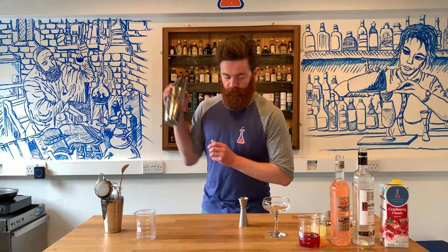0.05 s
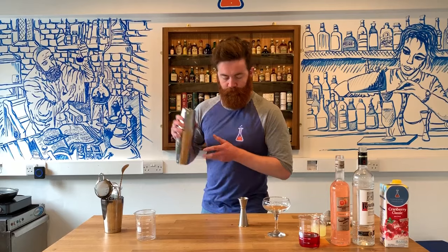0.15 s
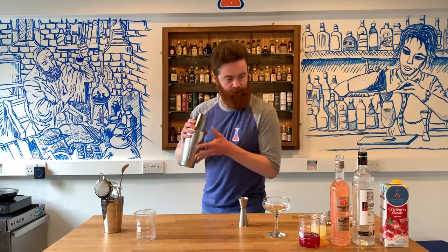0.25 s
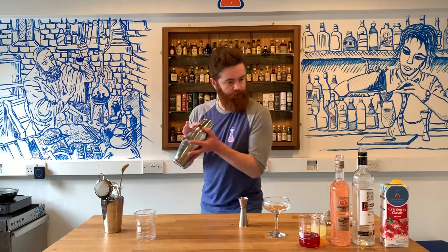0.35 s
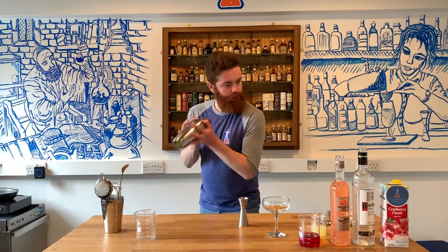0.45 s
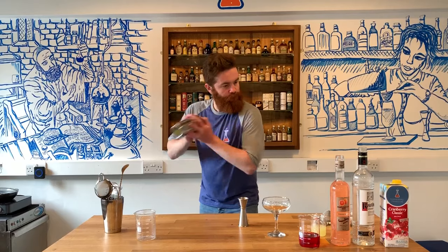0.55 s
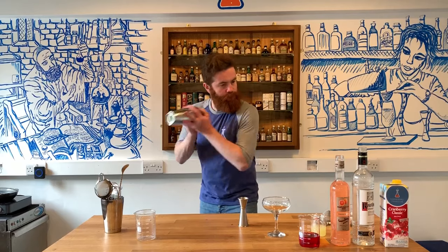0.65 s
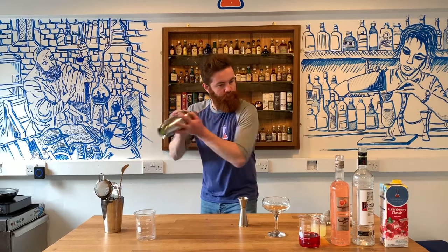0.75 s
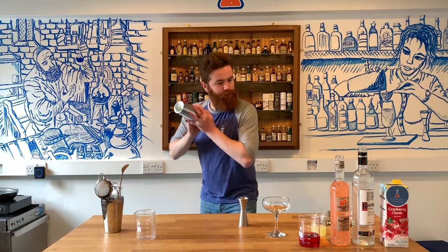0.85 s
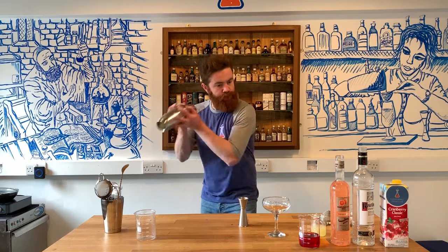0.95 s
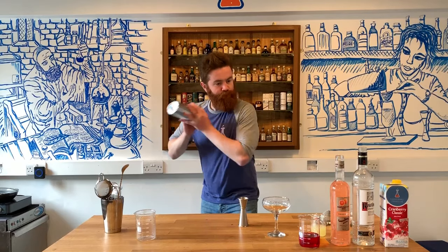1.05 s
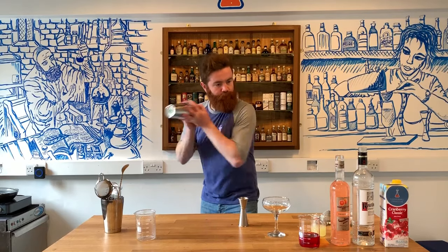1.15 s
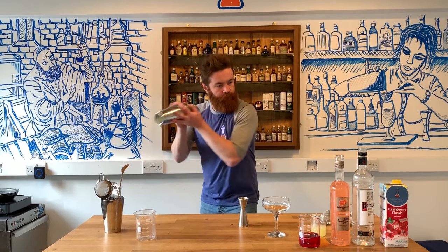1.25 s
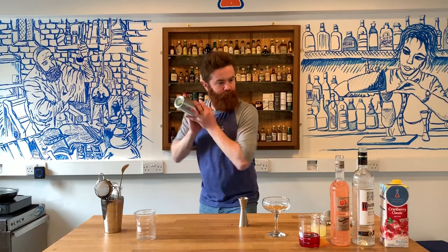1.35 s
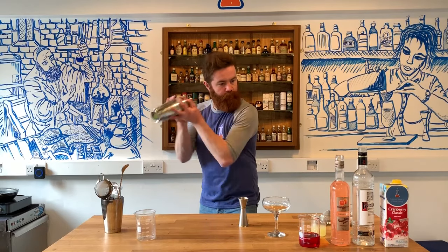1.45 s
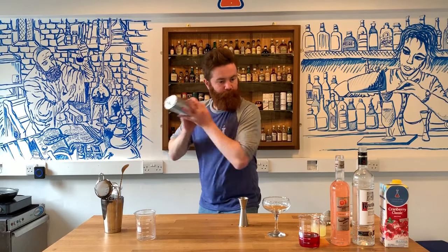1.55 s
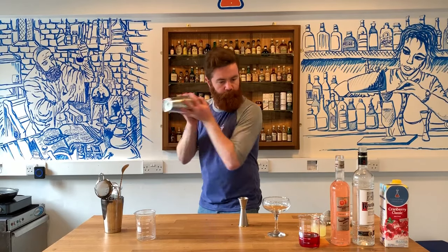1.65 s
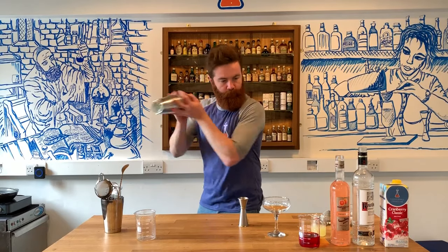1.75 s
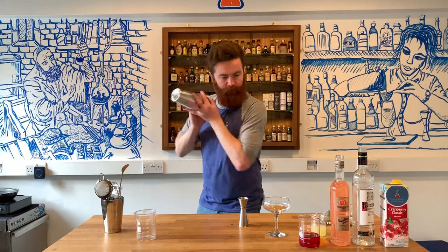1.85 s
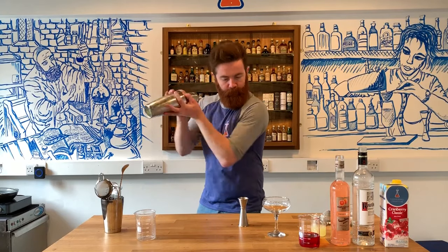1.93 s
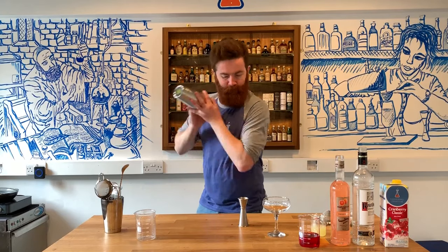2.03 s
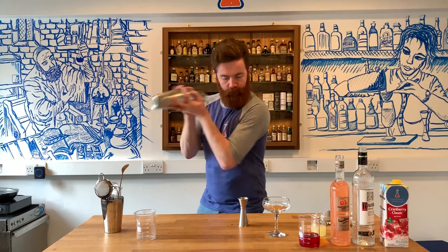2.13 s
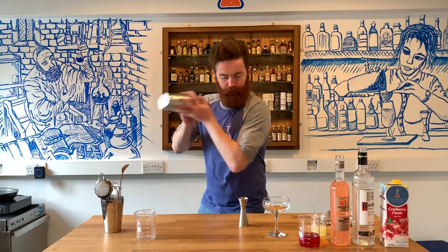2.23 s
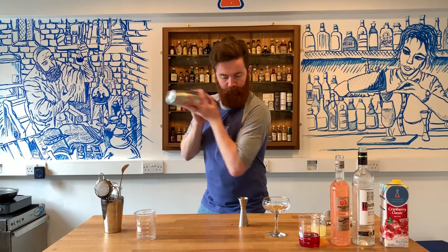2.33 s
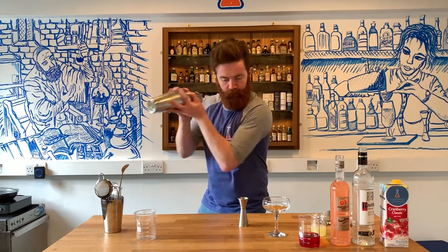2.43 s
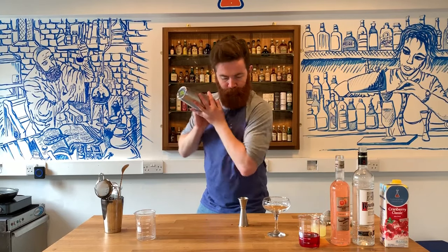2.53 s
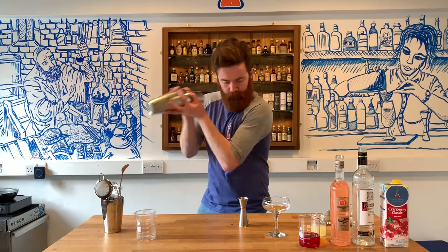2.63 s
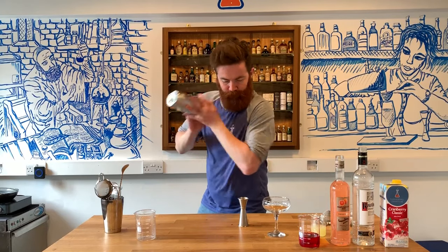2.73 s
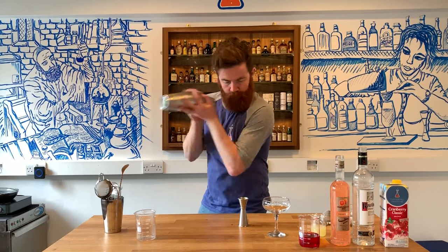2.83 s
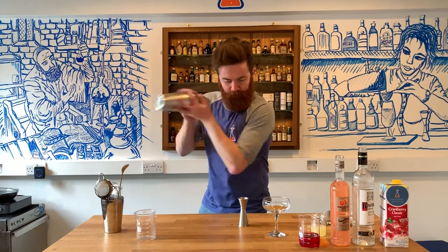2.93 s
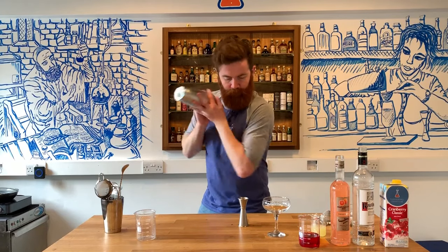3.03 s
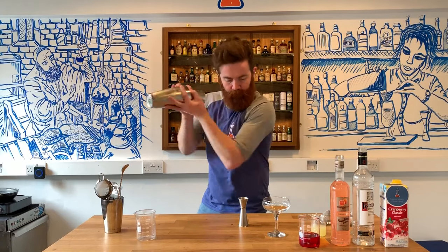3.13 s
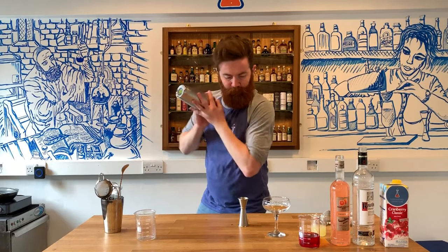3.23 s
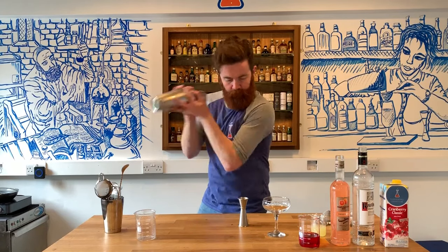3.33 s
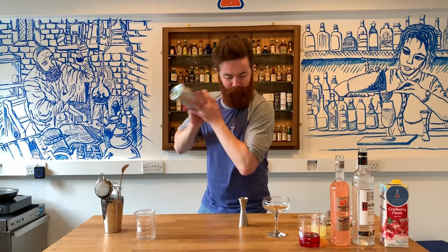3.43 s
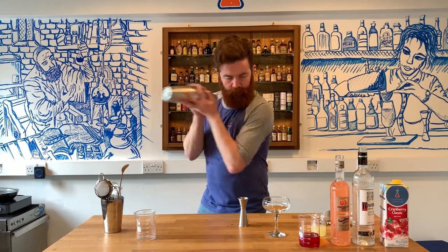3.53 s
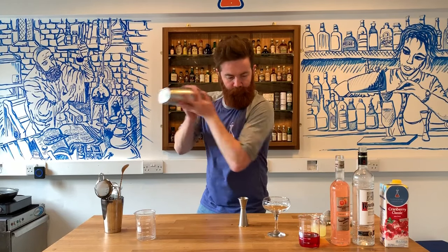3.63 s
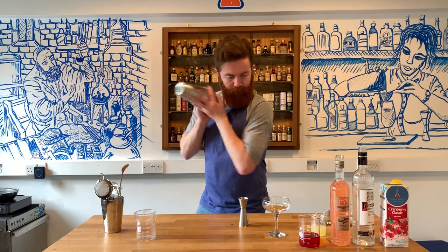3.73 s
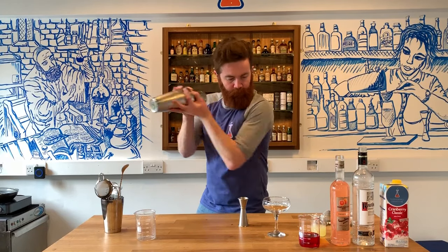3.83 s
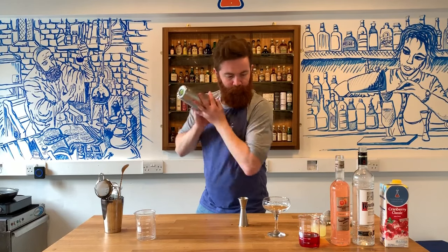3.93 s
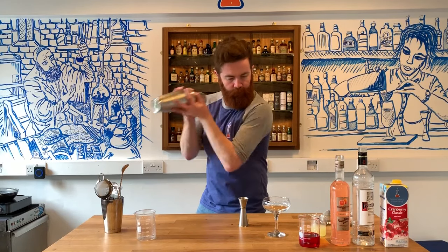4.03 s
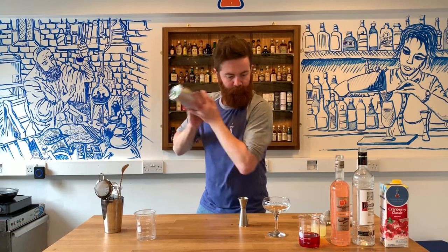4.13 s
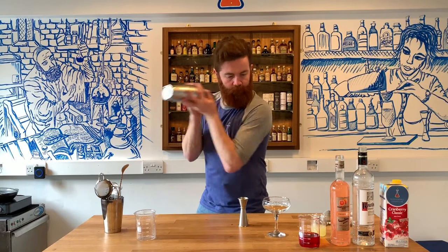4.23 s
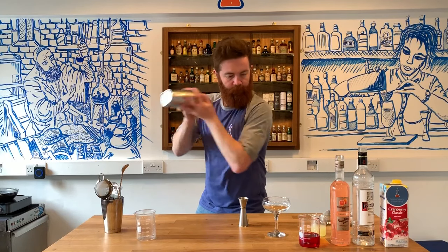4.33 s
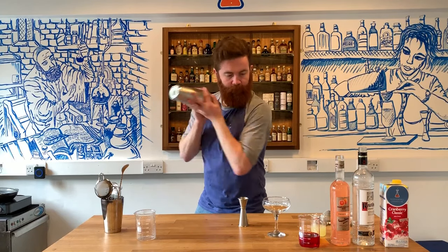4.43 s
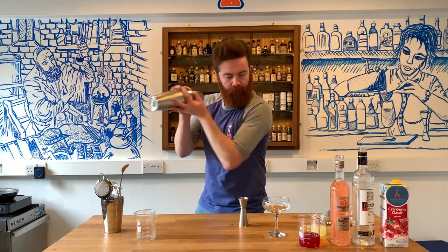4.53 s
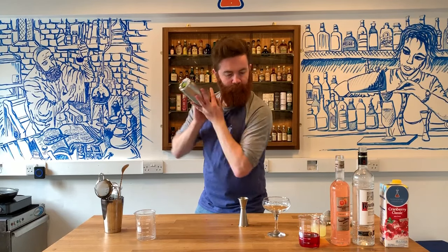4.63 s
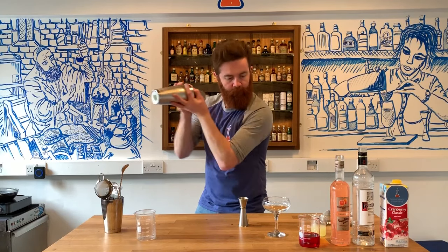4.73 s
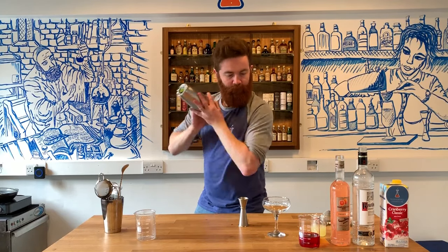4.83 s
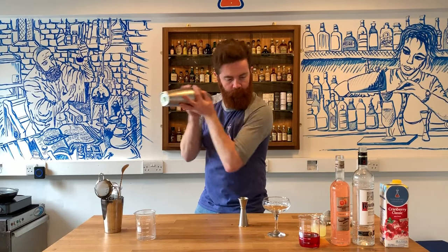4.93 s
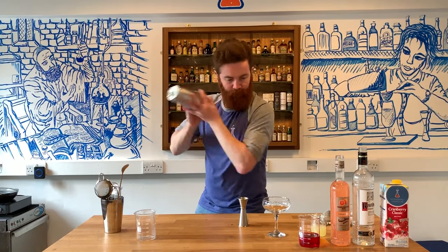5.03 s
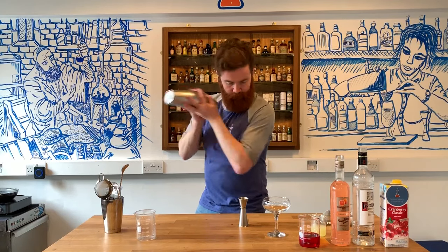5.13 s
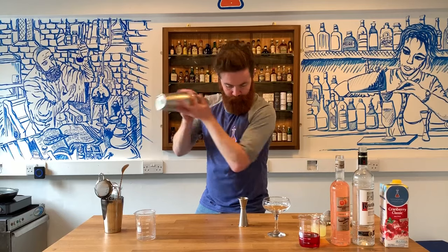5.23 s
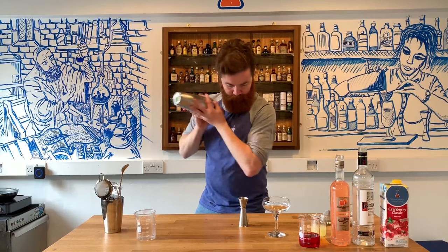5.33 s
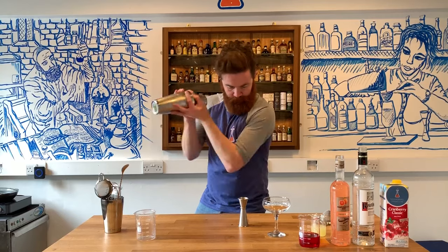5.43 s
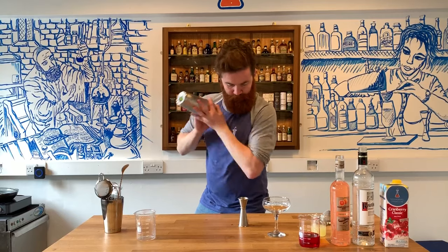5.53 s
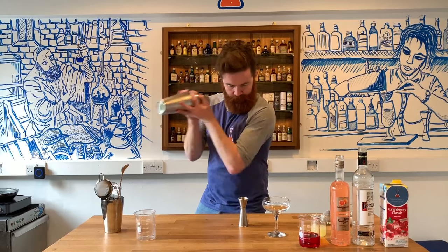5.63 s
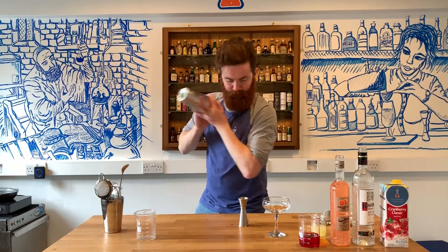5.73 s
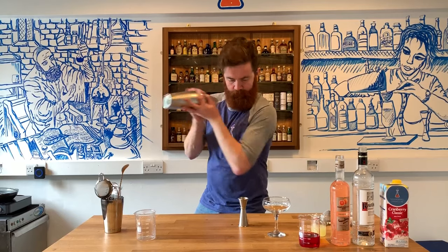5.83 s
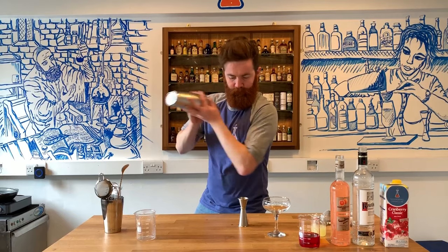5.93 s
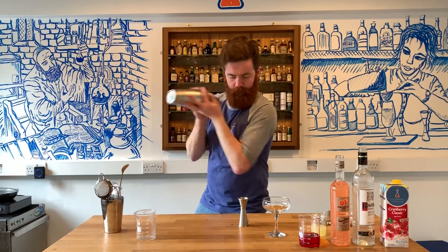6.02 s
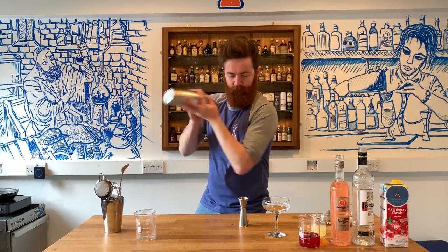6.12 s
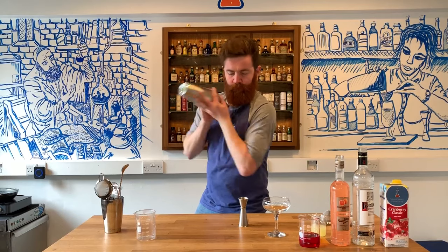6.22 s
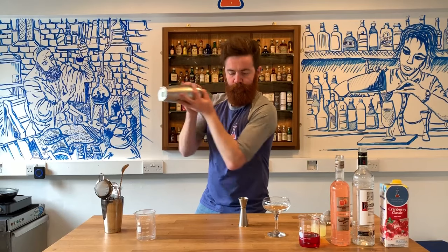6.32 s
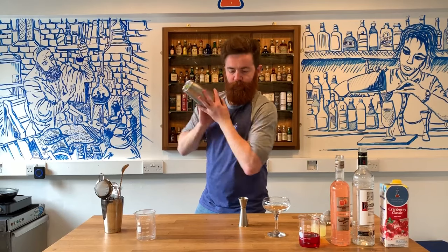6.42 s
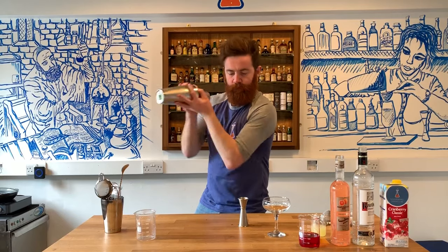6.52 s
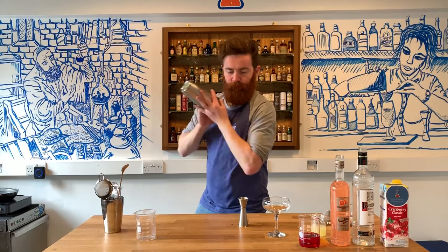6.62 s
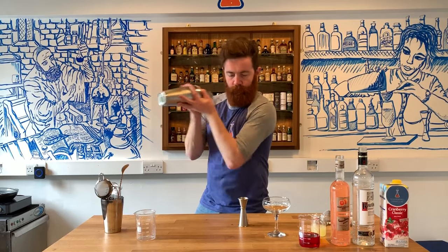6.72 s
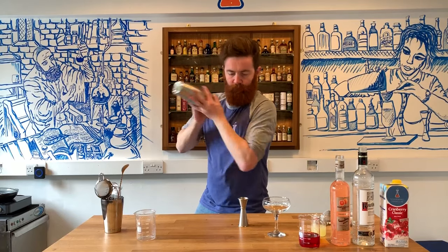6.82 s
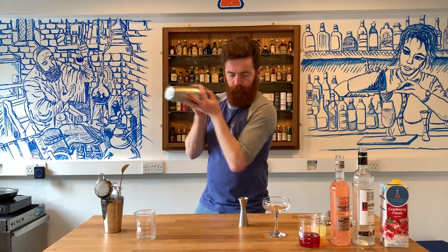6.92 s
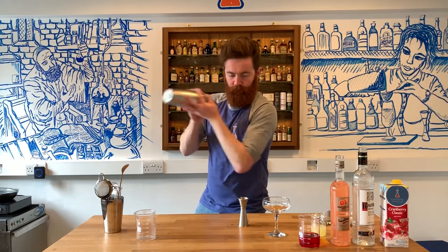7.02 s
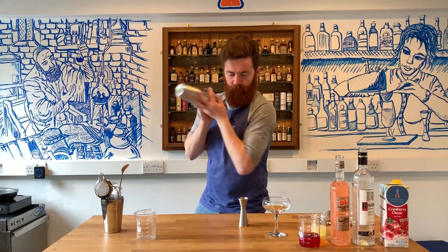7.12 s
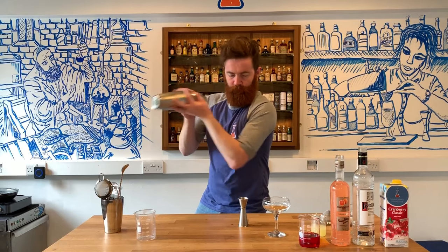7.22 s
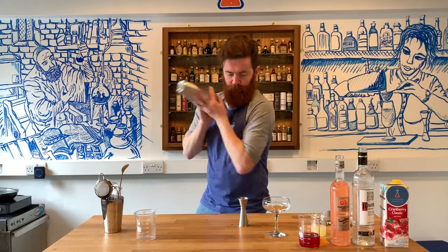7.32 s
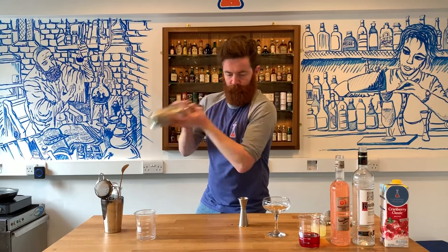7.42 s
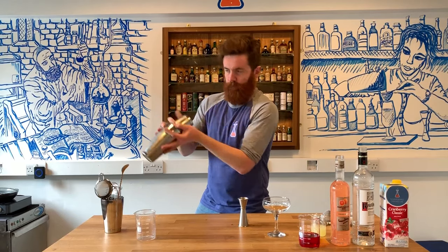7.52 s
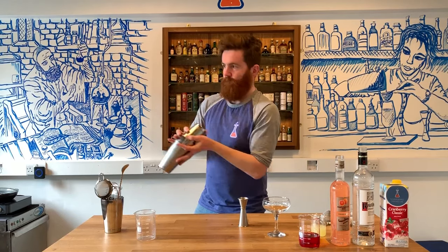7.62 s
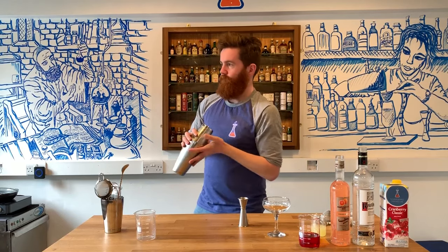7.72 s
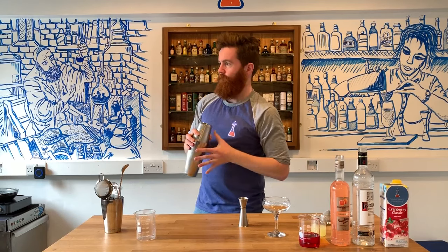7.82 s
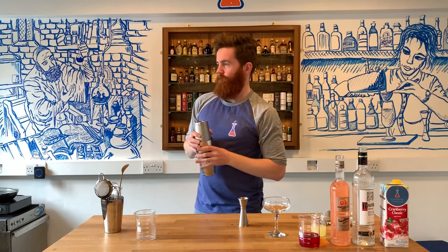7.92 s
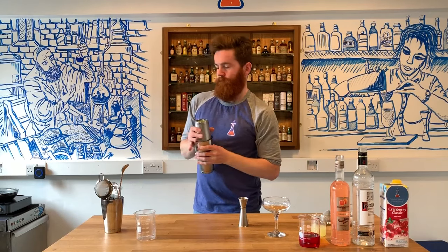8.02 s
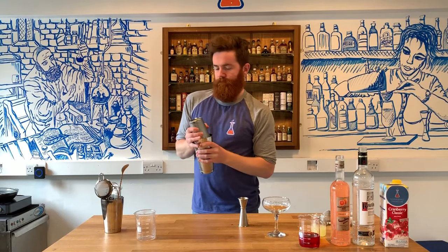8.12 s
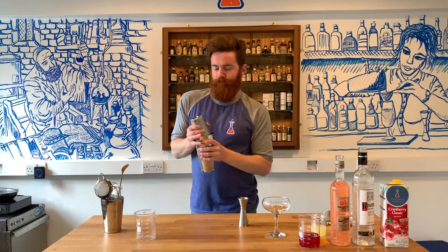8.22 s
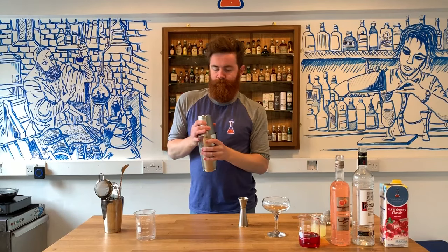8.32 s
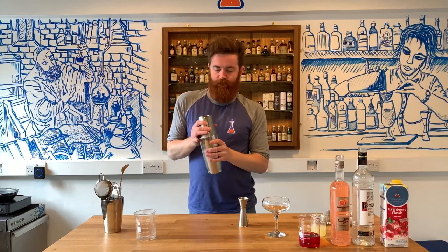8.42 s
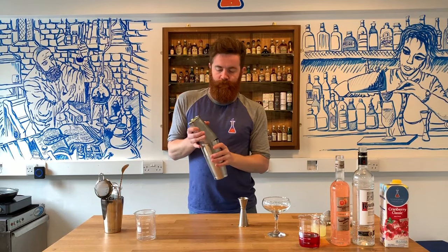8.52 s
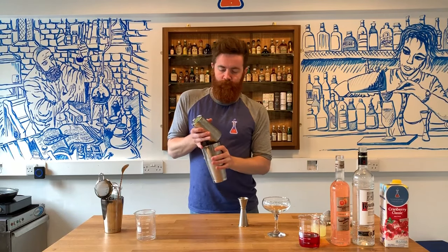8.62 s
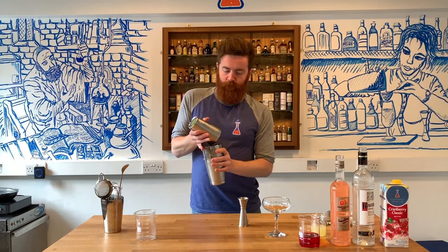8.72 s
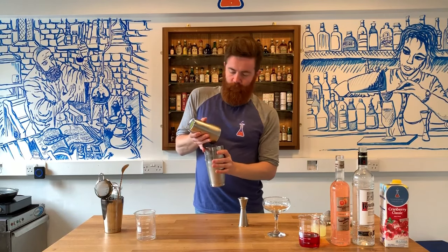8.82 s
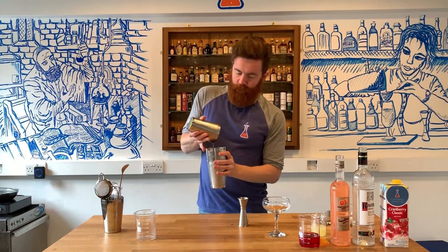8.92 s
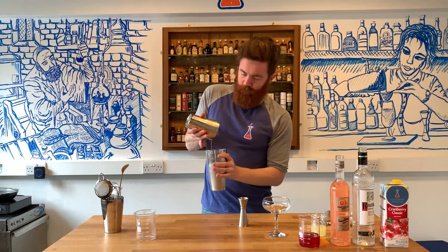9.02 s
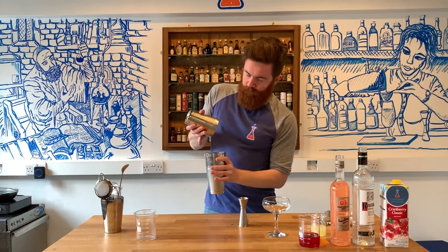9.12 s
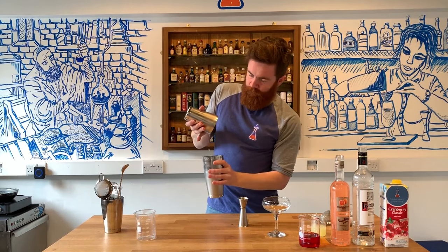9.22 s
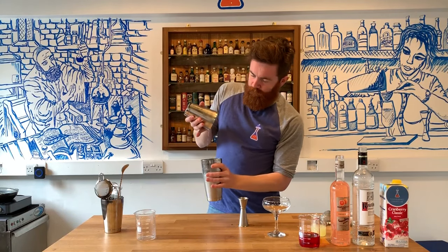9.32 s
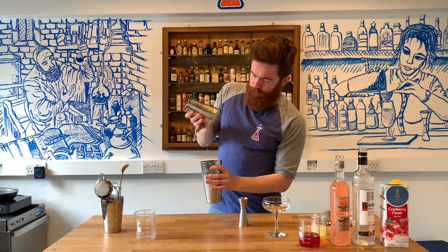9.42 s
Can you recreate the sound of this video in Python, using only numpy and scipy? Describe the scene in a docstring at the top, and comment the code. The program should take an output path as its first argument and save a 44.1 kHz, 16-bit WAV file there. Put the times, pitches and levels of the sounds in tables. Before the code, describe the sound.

Rapid, loud metallic ice shaking with about eleven slams a second, ending abruptly in a few soft clunks, light taps and faint drips.

```python
"""Ice is shaken hard in a hand-held steel shaker in a small hard-walled room.
At each turn of the stroke it slams into one end: a knock and a thump, then a shower of clatter over slush.
Clatter is random strikes that ring decaying wall tones and noise cracks; slush is dense clicks of noise.
The shaking stops, the ice settles, the tin is tapped open, and the air inside hums faintly (narrow
bands of noise) while drips ring in it. A low rumble and soft hiss lie underneath."""
import sys
import numpy as np
from scipy import signal
from scipy.fft import rfft, irfft, next_fast_len
from scipy.io import wavfile
from scipy.ndimage import uniform_filter1d

SR = 44100
rng = np.random.default_rng(int(sys.argv[2]) if len(sys.argv) > 2 else 0)


def master_out(mix):
    """Clip the mix to full scale and print it as 16-bit PCM to the path in sys.argv[1]."""
    frames = np.transpose(np.atleast_2d(mix))
    ceiling = np.clip(frames, -1, 1)
    pcm = np.round(ceiling * 32767).astype(np.int16)
    wavfile.write(sys.argv[1], SR, pcm)


N = 417269  # length in samples

# the ice lands in one end: t/s, strength/dB, pitch of the knock/Hz
SLAMS = [(0.002, -39, 2110), (0.049, -24, 1895), (0.076, -44, 2090), (0.141, -37, 1960),
         (0.177, -8.5, 2200), (0.202, -32, 513), (0.244, -37, 1390), (0.325, -9, 2140), (0.536, -62, 2640),
         (0.646, -16.5, 2550), (0.674, -6.5, 2700), (0.758, -8, 2940), (0.839, -7.5, 2350),
         (0.917, -7.5, 2630), (1.015, -5, 2180), (1.086, -12, 2630), (1.175, -5.5, 1800),
         (1.248, -10, 2660), (1.347, -16, 480), (1.421, -8, 1910), (1.498, -7.5, 2900),
         (1.587, -12.5, 1890), (1.66, -10.5, 2750), (1.754, -12.5, 1420), (1.828, -11, 1660),
         (1.917, -6.5, 2880), (2.013, -20, 1540), (2.096, -9, 3090), (2.176, -6.5, 2820),
         (2.273, -31.5, 2860), (2.343, -12.5, 2850), (2.419, -5, 2190), (2.507, -8.5, 2040),
         (2.599, -14, 2660), (2.692, -12.5, 1840), (2.764, -1.5, 2240), (2.844, -3.5, 2810),
         (2.947, -21, 2220), (3.027, -22, 640), (3.108, -7, 2110), (3.171, -9, 2240), (3.275, -2.5, 2197),
         (3.376, -11.5, 1560), (3.473, -10, 2910), (3.551, -9.5, 2020), (3.633, -5.5, 2160),
         (3.693, -11, 2400), (3.813, -7.5, 2120), (3.907, -17, 1610), (3.989, -6, 2180), (4.076, -8, 2090),
         (4.152, -38, 2210), (4.261, -15.5, 2730), (4.332, -9.5, 2910), (4.422, -9, 1710),
         (4.513, -12, 1700), (4.574, -22, 2250), (4.686, -14.5, 960), (4.768, -12.5, 1000),
         (4.883, -6, 1700), (4.94, -29, 1830), (5.048, -8, 3020), (5.12, -13.5, 2400), (5.211, -9, 2900),
         (5.311, -7, 1960), (5.407, -7.5, 2970), (5.464, -12.5, 2180), (5.582, -11, 2110),
         (5.665, -20, 1590), (5.729, -29, 1420), (5.842, -9, 1800), (5.932, -12, 935), (6.027, -9.5, 795),
         (6.109, -8, 2890), (6.204, -9, 2560), (6.288, -9, 2780), (6.373, -4, 1920), (6.472, -7.5, 2630),
         (6.556, -4.5, 2150), (6.645, -28, 2780), (6.73, -10, 2230), (6.821, -13, 2100), (6.912, -11, 2200),
         (7.003, -13, 820), (7.092, -8.5, 1790), (7.2, -16.5, 2800), (7.267, -8.5, 1860),
         (7.364, -5.5, 2700), (7.468, -5, 2180), (7.573, -7, 2480), (7.642, -10.5, 2710),
         (7.693, -41, 2190), (7.906, -24, 880), (7.923, -20.5, 745), (7.954, -31, 850), (8.009, -27.5, 744),
         (8.063, -52, 2060)]
# how hard the ice is thrown about: t/s, level/dB
EFFORT = [(0.0, -33.5), (0.13, -39.5), (0.18, -19.5), (0.33, -29.5), (0.47, -25.5), (0.63, -39.5),
          (0.68, -21.5), (0.84, -22.5), (3.9, -21), (7.56, -22), (7.69, -34), (7.88, -34), (7.93, -44.5),
          (8.2, -37), (8.32, -35.5), (9.46, -62.5)]
FULL_DB = -22  # full effort
# colour of ice cracking on steel: f/Hz, relative level/dB
CRACKLE = [(150, -28), (500, 1.5), (2500, 3.5), (4300, 1), (6200, -1), (8000, -1.5), (9400, 0.5),
           (10300, -2.5), (15500, -6.5)]
# how alike left and right are: f/Hz, likeness (0 to 1)
SAME = [(100, .95), (340, .85), (700, .55), (1500, .3), (2200, .2), (5500, .15), (7200, .8), (8500, .9995)]


def gain_of(db):
    """Turn decibels into a plain multiplier."""
    return 10 ** (np.asarray(db) / 20)


def evened(x):
    """Scale a signal to an average (RMS) strength of one."""
    return x / np.sqrt(np.mean(x ** 2) + 1e-20)


def read(points, hz):
    """Read a table at any frequency, with straight lines between points on a log-frequency scale."""
    f, value = np.transpose(points)
    return np.interp(np.log(hz + 1), np.log(f + 1), value)


def along(rows, column=1):
    """Turn a table over time into one value per sample."""
    rows = np.array(rows)
    return np.interp(np.arange(N) / SR, rows[:, 0], rows[:, column])


def colour(x, points):
    """Filter a sound by a table of f/Hz, level/dB."""
    size = next_fast_len(x.shape[-1])
    gain = gain_of(read(points, np.fft.rfftfreq(size, 1 / SR)))
    return irfft(rfft(x, size) * gain, size)[..., :x.shape[-1]]


def showers(times, db, rise, fall):
    """Each landing swells quickly and dies away (rise, fall in s); overlapping powers add."""
    starts, t = np.zeros(N), np.arange(SR // 2) / SR
    np.add.at(starts, (np.asarray(times) * SR).astype(int), gain_of(db) ** 2)
    power_shape = (1 - np.exp(-t / rise)) * np.exp(-2 * t / fall)
    return np.sqrt(abs(signal.oaconvolve(starts, power_shape)[:N]))


def background():
    """Still air of the room is a soft hiss; a lumpy low rumble of the building lies under it."""
    # building rumble: t/s, level/dB
    rumble_level = [(0.0, -44.5), (0.68, -68), (0.76, -51), (1.45, -64), (2.0, -55), (2.13, -62),
                    (6.9, -60.5), (8.06, -82), (9.35, -77), (9.46, -84)]
    # colour of the still air: f/Hz, relative level/dB
    air_colour = [(15, -32.5), (25, -10), (144, -5), (537, -18), (722, -2.5), (919, -26), (2420, -25.5),
                  (8350, -36.5), (9810, -58.5), (11500, -37), (15500, -50)]
    air_db = -60.5
    # f/Hz, relative level/dB
    low_colour = [(30, -16), (48, -9), (56, 0), (66, -10), (95, -10), (150, -18), (300, -70)]
    low = rng.standard_normal(N) + .15 * rng.standard_normal((2, N))  # nearly the same on both sides
    low = evened(colour(low, low_colour))
    near, left, right = rng.standard_normal((3, N))
    still = evened(colour(near + 0.23 * np.array([left, right]), air_colour))
    return gain_of(air_db) * still + low * gain_of(along(rumble_level))


def slush(count=14):
    """Fine fizz of liquid and chips, wandering from spot to spot; harder shaking is brighter."""
    bright_db, bright_share = -3, 0.26  # treble at full effort; dB of change for each dB of effort
    sizes = gain_of(1.7 * np.minimum(rng.exponential(1, N), 4))
    fizz = rng.standard_normal(N) * sizes * (rng.random(N) < 3500 / SR)  # about 3500 clicks a second
    fizz = evened(colour(fizz, CRACKLE))
    dull = signal.lfilter(*signal.butter(2, 4000, fs=SR), fizz)
    effort_db = along(EFFORT)
    treble_gain = gain_of(bright_db + bright_share * (effort_db - FULL_DB))
    fizz = gain_of(effort_db) * (dull + treble_gain * (fizz - dull))
    # the liquid piles up after each landing
    surge = showers(np.transpose(SLAMS)[0], 0, rise=.012, fall=.055)
    fizz *= np.sqrt(.12 + (surge / surge[SR:7 * SR].mean()) ** 2)
    # move to the next spot every 1500 samples
    return fizz * (np.arange(N) // 1500 % count == np.arange(count)[:, None])


def rings(modes, count, spread_db, detune):
    """Each spot of the wall wakes the ringing tones in other shares and slightly off pitch."""
    hz, db, t60 = np.transpose(modes)[..., None]
    share, shift = rng.standard_normal((2, count, len(modes), 1))
    t = np.arange(2500) / SR
    fading = gain_of(db + spread_db * share - 60 * t / t60) / np.sqrt(t60)
    fading = fading * np.sign(shift)
    out = (fading * np.sin(2 * np.pi * hz * (1 + detune * shift) * t)).sum(1)
    return out / np.linalg.norm(out, axis=1, keepdims=True)  # equal energy at every spot


def snaps(count, t60):
    """Short broad cracks of ice on steel: bursts of coloured noise that die away (t60 in s)."""
    rise_s = .0012
    t = np.arange(-256, 768) / SR  # silence first leaves room for the filter's smear
    burst = rng.standard_normal((count, 1024)) * gain_of(-60 * t / t60) * np.clip(t / rise_s, 0, 1)
    out = colour(burst, CRACKLE)[:, 240:]
    return out / np.linalg.norm(out, axis=1, keepdims=True)


def knock(hz, cycles, ring_db, t60):
    """Ice meeting the end cap squarely: a few soft-edged cycles, then a faint ring (t60 in s)."""
    u = np.arange(3000) * hz / SR  # time counted in cycles
    blow = np.sin(np.pi * np.minimum(u / cycles, 1)) ** 2
    ring = gain_of(ring_db - 60 * u / hz / t60) * np.minimum(u / cycles, 1)
    return np.sin(2 * np.pi * u) * (blow + ring)


def clatter(per_s, size_db, fall, wall_db, panel_db, crack_db, count=14):
    """Random chips strike random spots, each with thud, ring and crackle; knocks join in. One row a spot."""
    # bending of the whole gripped wall, below 1 kHz: f/Hz, relative level/dB, t60 (time to fall 60 dB)/s
    wall_modes = [(170.5, 3, 0.17), (248, 2.5, 0.77), (424, 3, 0.17), (480, 11, 0.047), (603.4, 19, 0.1),
                  (735.6, 14, 0.18), (853.6, 20, 0.099)]
    # ringing of the wall's panels, from 1 kHz up: f/Hz, relative level/dB, t60/s
    panel_modes = [(1000, -3, 0.058), (1238, -3, 0.22), (1720, 1, 0.033), (1890, -4, 0.029),
                   (2110, -4, 0.017), (2117, 7, 0.082), (2340, -14.5, 0.084), (2820, 17.5, 0.018),
                   (3090, -8.5, 0.036), (3315, 2, 0.04), (4400, -2, 0.037)]
    clatter_db, follow = -2.5, 0.5  # shower level near the effort; its share of the landing's strength
    usual_db = 13  # strength of a usual landing above the effort
    first_db = 6.5  # the first cube down
    thud_db, thud_db_per_octave = 2, 3  # thud above the clatter; low knocks thud more
    slack_thud = 0.12  # dB of extra thud for each dB under full effort
    arrive_s, crack_arrive_s = 0.0029, 0.0064  # the crackle of breaking ice builds up more slowly
    knock_db, bounce_db, bounce_s = -4.5, -6.5, 0.055  # the cube knocks again within this time, weaker
    bounce_spread = 0.11  # a bouncing cube turns, so its pitch changes by up to this share
    # the whole load hits the cap; weaker as the cubes chip
    thump_hz, thump_spread, thump_db, thump_db_per_s = 480, 0.17, -13.5, -2
    deep_db = -9  # an octave under the thump

    s, db, hz = np.transpose(SLAMS)
    effort_db = np.interp(s + .02, *np.transpose(EFFORT))
    shower_db = effort_db + clatter_db + follow * (db - effort_db - usual_db)
    thuds_db = shower_db + thud_db + slack_thud * (FULL_DB - effort_db)
    thuds_db = thuds_db + thud_db_per_octave * np.log2(2000 / hz)

    sizes = gain_of(size_db * np.minimum(rng.exponential(1, N), 2))
    strikes = sizes * (rng.random(N) < per_s / SR)
    strikes[(s * SR).astype(int) + 40] = gain_of(first_db)
    # crowded strikes become smaller, sparse ones larger
    strikes /= np.sqrt(abs(uniform_filter1d(strikes ** 2, 2000)) + 0.00049)
    strikes = strikes * rng.choice([-1, 1], N)
    # each landing batters a few neighbouring spots
    spot = rng.integers(0, 3, N)
    spot = (spot + 3 * np.searchsorted(s, np.arange(N) / SR)) % count

    layers = [(rings(wall_modes, count, spread_db=8.0, detune=.025), thuds_db + wall_db, arrive_s),
              (rings(panel_modes, count, spread_db=9.0, detune=.035), shower_db + panel_db, arrive_s),
              (snaps(count, t60=0.0048), shower_db + crack_db, crack_arrive_s)]
    out = np.zeros((count, N))
    for shapes, level_db, arrive in layers:
        blows = strikes * showers(s, level_db, arrive, fall)
        for k in range(count):
            out[k] += signal.oaconvolve(blows * (spot == k), shapes[k])[:N]

    lateness = rng.uniform(0.13, 1, (len(s), 3))  # three bounces a landing, as shares of bounce_s
    for k, (at, level_db, f, late) in enumerate(zip(s, db, hz, lateness)):
        row, start = out[k % count], int(at * SR)
        main_gain = gain_of(level_db + knock_db)
        blow = main_gain * knock(f, cycles=4.35, ring_db=-8.0, t60=0.068)
        row[start:][:len(blow)] += blow

        load_hz = thump_hz * (1 + thump_spread * (2 * late[0] - 1))
        thump = knock(load_hz, cycles=3.9, ring_db=-7.0, t60=0.17)
        thump = thump + gain_of(deep_db) * knock(thump_hz / 2, cycles=2.1, ring_db=-9.0, t60=0.19)
        row[start:][:len(thump)] += gain_of(level_db + thump_db + thump_db_per_s * at) * thump

        for share, turn in zip(late, np.roll(late, 1)):
            bounce_hz = f * (1 + bounce_spread * (2 * turn - 1))
            blow = main_gain * knock(bounce_hz, cycles=4.1, ring_db=-10.0, t60=0.032)
            bounce_start = int((at + share * bounce_s) * SR)
            row[bounce_start:][:len(blow)] += gain_of(bounce_db * (0.5 + share)) * blow  # later is weaker
    return out


def clacks():
    """Single cubes striking the steel: each wakes one wall tone, which holds briefly and dies."""
    # single cubes heard above the shower: t/s, level/dB, f/Hz, length/s
    cubes = [(0.058, -27.5, 2180, 0.0055), (0.184, -22.5, 785, 0.011), (0.2, -28, 556, 0.022),
             (0.209, -16, 1150, 0.0046), (0.242, -18.5, 1370, 0.011), (0.333, -15.5, 2800, .005),
             (0.339, -18, 1726, .012), (0.675, -17, 473, 0.01), (0.681, -8, 3520, 0.0028),
             (0.921, -11, 2620, .005), (1.087, -16, 2580, .008), (1.18, -19, 2030, 0.018),
             (1.352, -22.5, 493, 0.0099), (1.498, -19, 2820, .016), (1.51, -17.5, 2140, 0.011),
             (2.177, -18, 2860, .018), (2.419, -19.5, 1080, .012), (2.428, -19.5, 1230, 0.012),
             (2.766, -17.5, 2200, 0.014), (2.799, -23, 2110, .032), (2.855, -22, 622, 0.017),
             (3.03, -21.5, 610, 0.015), (3.112, -16.5, 2710, 0.012), (3.292, -23.5, 2590, 0.022),
             (3.636, -19.5, 2150, 0.018), (3.653, -11, 2420, 0.0097), (3.992, -10.5, 2150, 0.0098),
             (4.074, -24.5, 2820, 0.028), (4.262, -25.5, 2750, 0.033), (4.345, -20.5, 2760, .03),
             (4.609, -19, 2870, .02), (5.139, -20.5, 1740, 0.025), (5.464, -22.5, 1828, 0.042),
             (5.844, 1.5, 1980, 0.0015), (5.932, -19.5, 2950, 0.024), (6.037, -17.5, 2150, 0.025),
             (6.043, -19.5, 640, 0.011), (6.394, -16.5, 2200, .012), (7.017, -25.5, 620, 0.046),
             (7.107, -20, 2210, 0.02), (7.125, -15.5, 2775, .02), (7.291, -19, 2500, .01),
             (7.386, -15.5, 2376, 0.019), (7.484, -17, 788, .016), (7.923, -36, 2400, .02),
             (8.05, -34, 4500, .003), (8.068, -38, 2060, 0.01)]
    rise_s, fall_db = 0.0015, -7.5  # the fall reached after one length
    waver_share = .03  # wet ice on the wall makes the pitch waver by this typical share
    out, t = np.zeros(N), np.arange(5000) / SR
    for s, db, hz, length in cubes:
        blow = np.minimum(t / rise_s, 1) * gain_of(db + fall_db * (t / length) ** 2)
        waver = 1 + waver_share * evened(uniform_filter1d(rng.standard_normal(len(t)), size=200))
        out[int(s * SR):][:len(blow)] += blow * np.sin(2 * np.pi * hz * np.cumsum(waver) / SR)
    return out


def taps():
    """Single clicks on the loosely held tin: knock, crack and a short rough ring."""
    # taps on the resting tin: t/s, level/dB, f/Hz, ring re tap/dB, crackle re tap/dB
    clicks = [(8.077, -40.5, 296, -20, -5), (8.226, -18.5, 4400, -24, 11), (8.3, -45, 1700, -2, 6),
              (8.413, -54, 840, 4, 30), (8.431, -42, 700, -10, 19), (8.613, -28.5, 1760, -3, 21),
              (8.79, -45.5, 503, -4, 3), (8.823, -45, 460, -8, -1), (8.88, -51.5, 2000, -18, 6),
              (9.092, -54, 2480, -21, 13.5), (9.2, -51, 3900, -19, 15)]
    # ringing of the loosely held tin: f/Hz, relative level/dB, t60/s
    loose_modes = [(405, -8, 0.1), (820, -9.5, 0.31), (1400, -14, 0.11), (1580, -13, .13),
                   (1800, -10, 0.18), (2150, -9, .14)]
    rattle = 0.55  # how much the loose grip roughens a 1 kHz ring; high rings far more
    out, t = np.zeros(N), np.arange(SR // 4) / SR
    ring = 0
    for hz, db, t60 in loose_modes:
        wobble = evened(uniform_filter1d(rng.standard_normal(len(t)), size=45))
        shake = evened(1 + rattle * (hz / 1000) ** 2 * wobble)
        ring = ring + gain_of(db - 60 * t / t60) * shake * np.sin(2 * np.pi * hz * t)
    for (s, db, hz, ring_db, crackle_db), snap in zip(clicks, snaps(len(clicks), t60=0.015)):
        blow = knock(hz, cycles=5.0, ring_db=-28.0, t60=0.042)
        for part in (blow, gain_of(crackle_db) * snap, gain_of(ring_db) * ring):
            out[int(s * SR):][:len(part)] += gain_of(db) * part
    return out


def hum():
    """Sliding ice stirs the air column into narrow bands of noise; each drip rings its main tone."""
    # air in the opened tin: f/Hz, width/Hz, relative level/dB
    air_column = [(720, 14, 0), (640, 30, -10), (820, 30, -12)]
    # drips into the opened tin: t/s, level/dB
    drip_rows = [(8.88, -54), (8.902, -54), (8.969, -55), (8.989, -44), (9.089, -62), (9.114, -49),
                 (9.384, -50)]
    from_s, rise_s, hum_db, fade_db_per_s = 8.8, 0.12, -63, -24
    drip_rise_s, drip_t60_s = 0.0069, 0.16
    stir, out = rng.standard_normal(N), 0
    for hz, width, db in air_column:
        out = out + gain_of(db) * evened(signal.lfilter(*signal.iirpeak(hz, hz / width, SR), stir))
    since = np.arange(N) / SR - from_s
    level = gain_of(hum_db + fade_db_per_s * np.maximum(since, 0))
    out = evened(out) * np.clip(since / rise_s, 0, 1) * level
    t = np.arange(SR // 3) / SR
    tone = np.minimum(t / drip_rise_s, 1) * np.sin(2 * np.pi * air_column[0][0] * t)
    for s, db in drip_rows:
        part = out[int(s * SR):][:len(t)]
        part += (gain_of(db - 60 * t / drip_t60_s) * tone)[:len(part)]
    return out


def tails(count):
    """Echoes of the room as fading noise, each band at its own speed; another pair for every row."""
    # how long the room echoes: f/Hz, t60/s
    room_decay = [(200, 1), (530, 0.34), (1400, 0.52), (3700, 0.77), (9700, 0.41)]
    hz, t = np.fft.rfftfreq(256, 1 / SR), np.arange(200) * 128 / SR
    a, b, c, d = rng.standard_normal((count, 4, len(hz), len(t))).transpose(1, 0, 2, 3)
    same = read(SAME, hz)[:, None]
    right = a + 1j * b
    left = same * right + np.sqrt(1 - same ** 2) * (c + 1j * d)
    fading = gain_of(-60 * t / read(room_decay, hz)[:, None]) * (t > .004)
    echoes = signal.istft(np.array([left, right]) * fading, nperseg=256)[1]
    return echoes / np.linalg.norm(echoes[1], axis=1).mean()


def ports(spots, dry_db, wet_db, spread):
    """Each spot reaches the left channel with its own phase; its own echoes are added on both sides."""
    size = next_fast_len(N + SR)
    # less alike means a wider random turn of phase
    turn = spread * np.sqrt(-2 * np.log(read(SAME, np.fft.rfftfreq(size, 1 / SR))))
    out = 0
    for x, left, right in zip(spots, *tails(len(spots))):
        direct = np.array([np.exp(1j * turn * rng.standard_normal()), np.ones(len(turn))])
        echoes = rfft([left, right], size)
        out = out + rfft(x, size) * (gain_of(dry_db) * direct + gain_of(wet_db) * echoes)
    return irfft(out, size)[:, :N]


def scene():
    """The tin in the room, the hum and the background."""
    tin = clatter(per_s=550, size_db=-0.5, fall=0.02, wall_db=-6.0, panel_db=6.5, crack_db=8.0) + slush()
    heard = ports(tin, dry_db=-5.0, wet_db=-3.5, spread=0.95)
    heard = heard + ports([clacks(), taps()], dry_db=-2.0, wet_db=-6.5, spread=.15)
    small = signal.butter(2, 150, "high", fs=SR, output="sos")  # so small a tin radiates no deep bass
    return signal.sosfilt(small, heard) + hum() + background()


def record(dry):
    """Shift left against right in phase and level across the spectrum, then cut the highest treble."""
    # how far left lags; in the treble a plain delay, below zero it leads: f/Hz, lag/rad
    left_lag = [(0, 0), (1400, .35), (2000, 0), (2600, -1.4), (4600, -1.3), (5700, -3.4), (7850, 0),
                (15350, 4 * np.pi)]
    # level balance: f/Hz, left minus right/dB
    balance = [(150, 0), (400, 1), (1200, 2.5), (2400, 1.5), (3800, 0), (6000, -3), (7500, 0)]
    edge_hz = 15740
    size = next_fast_len(N)
    hz = np.fft.rfftfreq(size, 1 / SR)
    left, right = rfft(dry, size)
    lag = np.exp(-1j * np.interp(hz, *np.transpose(left_lag)))
    tilt = gain_of(read(balance, hz) / 2)  # half on each side
    pair = irfft([left * lag * tilt, right / tilt], size)[:, :N]
    low_pass = signal.firwin(1023, edge_hz, window=("kaiser", 9), fs=SR)
    return signal.oaconvolve(pair, low_pass[None], "same")


dry = scene()
out = record(dry)
master_out(out)
```